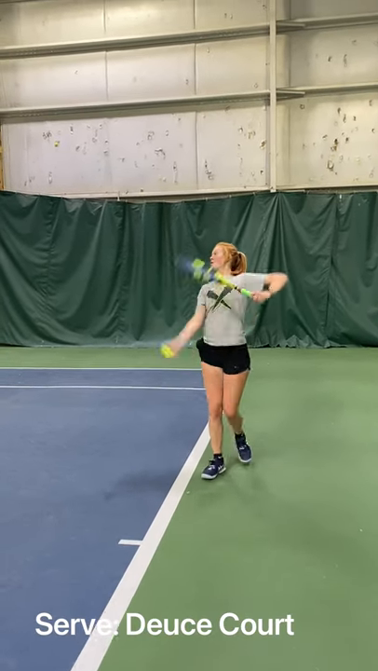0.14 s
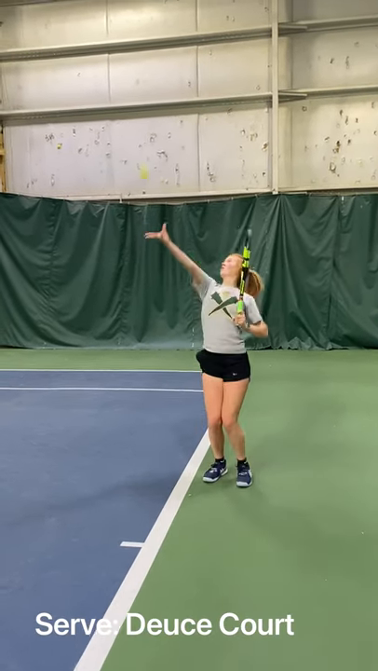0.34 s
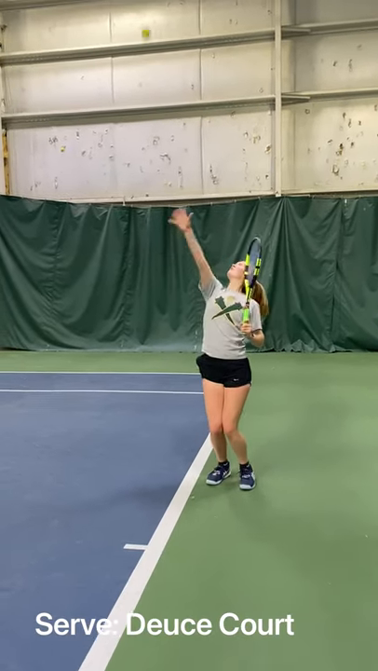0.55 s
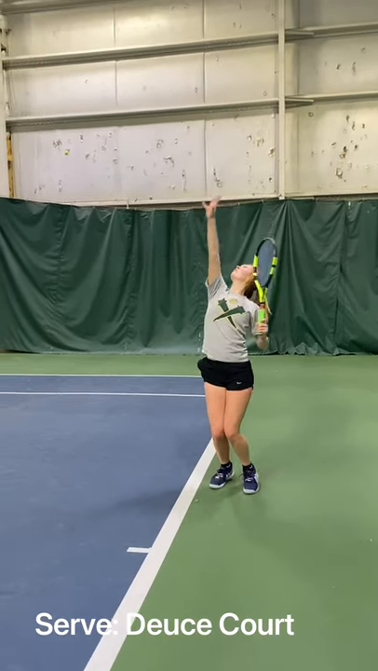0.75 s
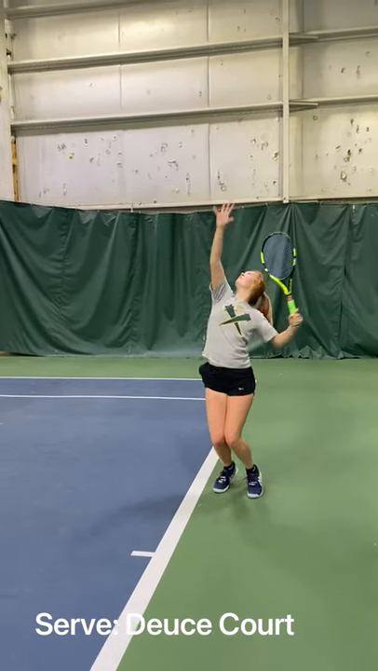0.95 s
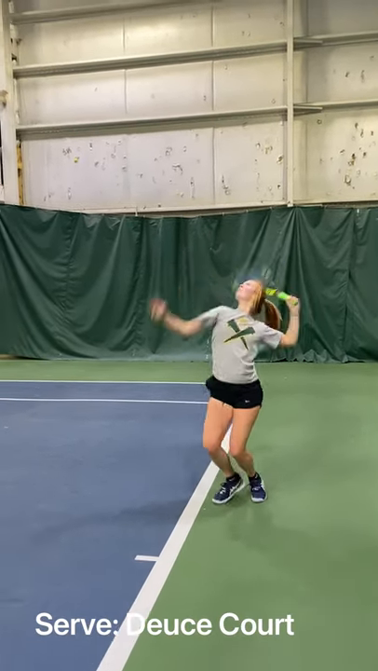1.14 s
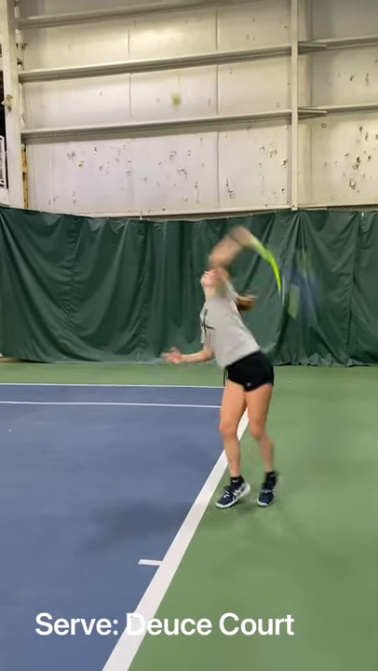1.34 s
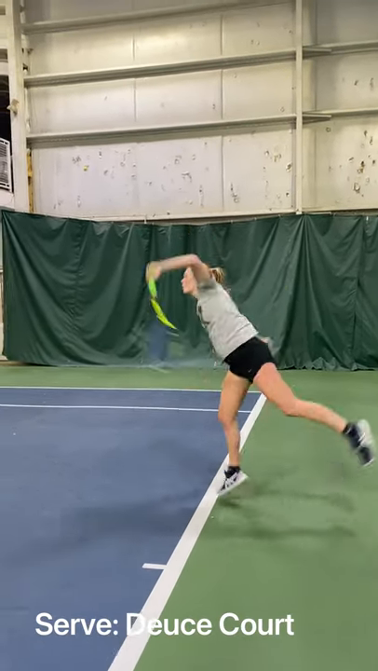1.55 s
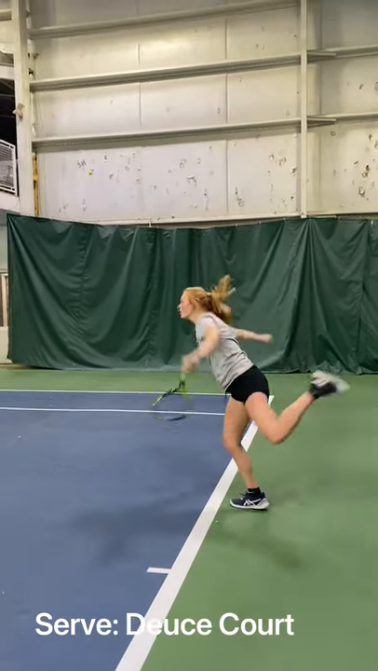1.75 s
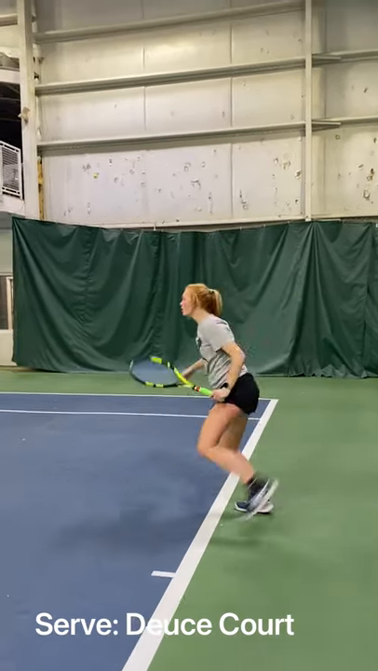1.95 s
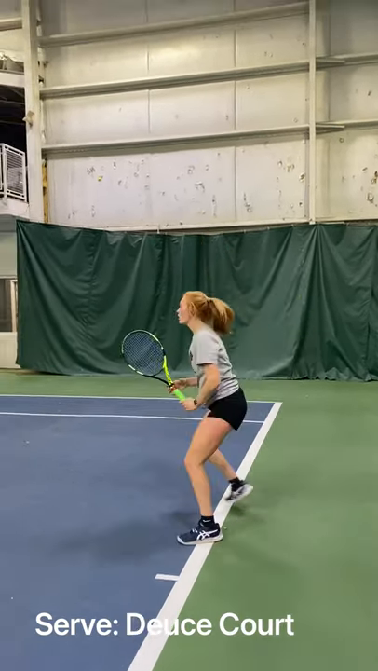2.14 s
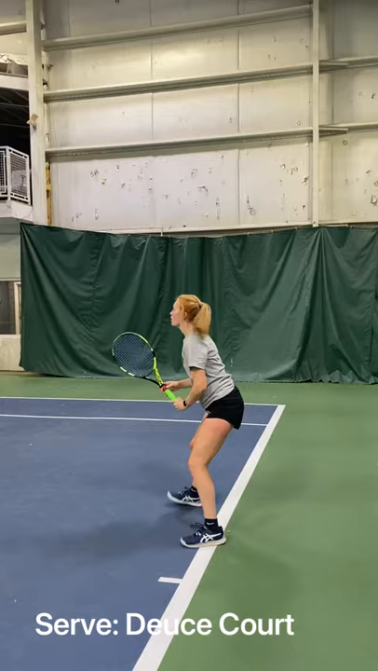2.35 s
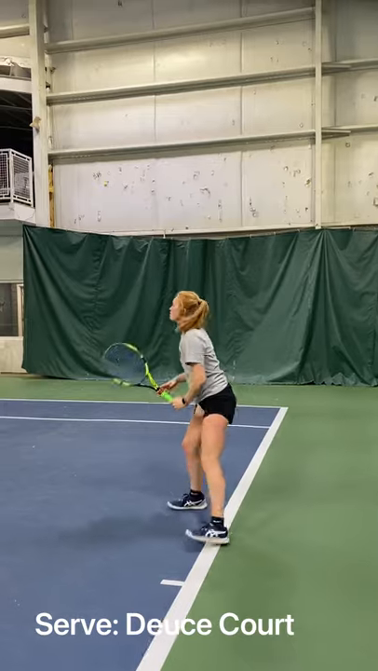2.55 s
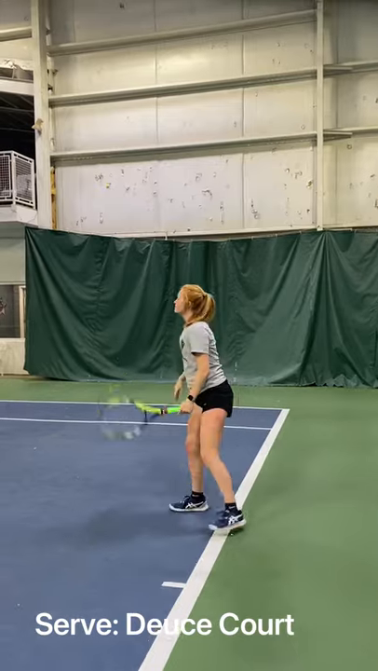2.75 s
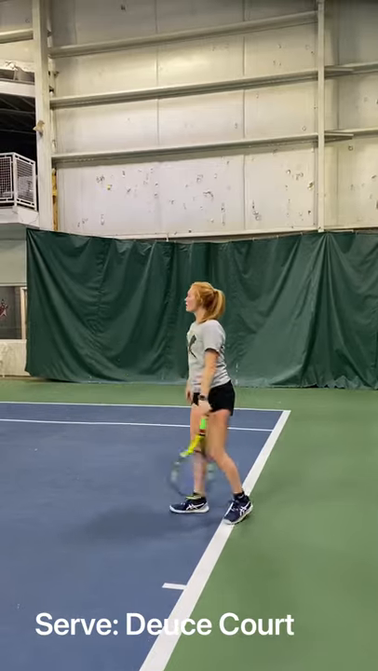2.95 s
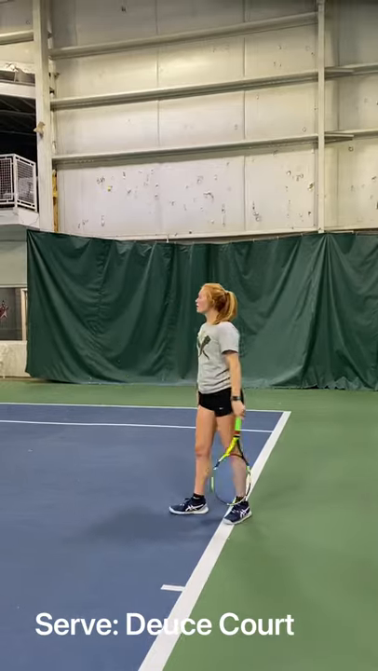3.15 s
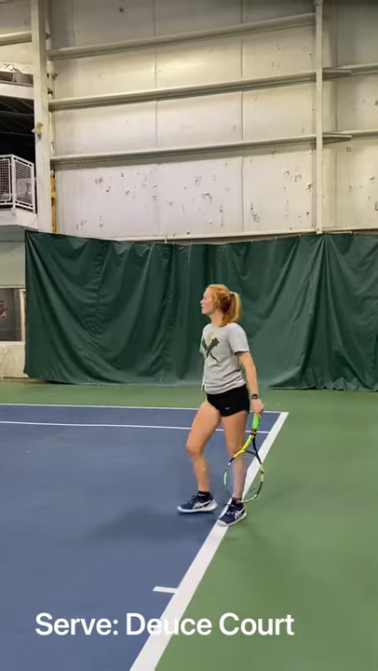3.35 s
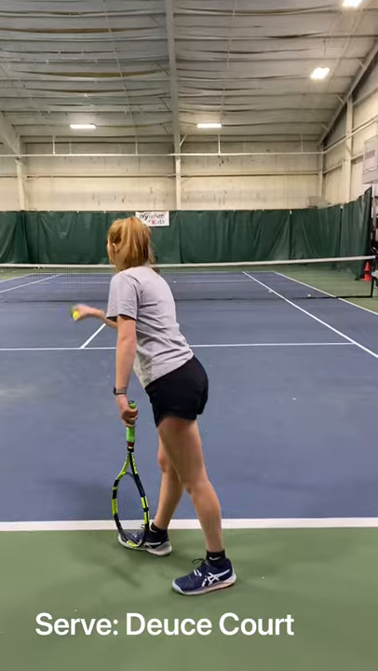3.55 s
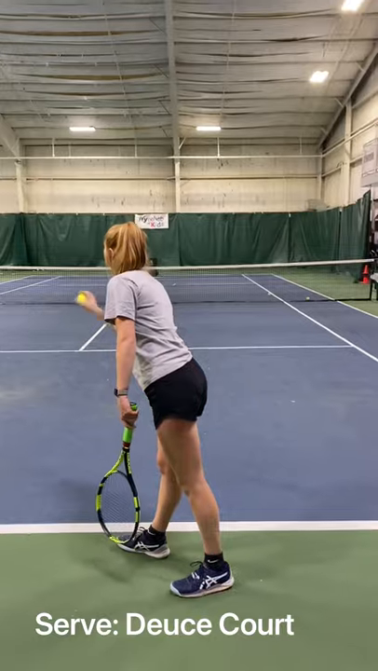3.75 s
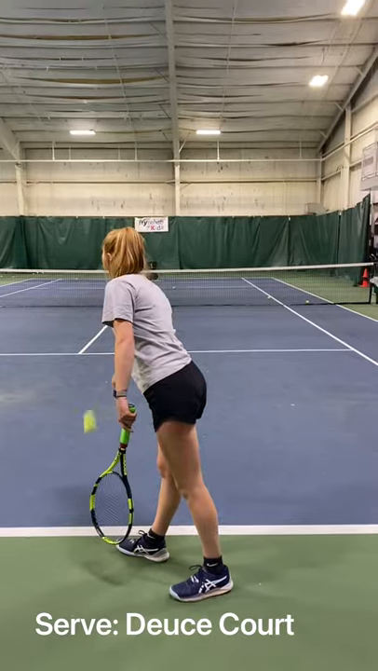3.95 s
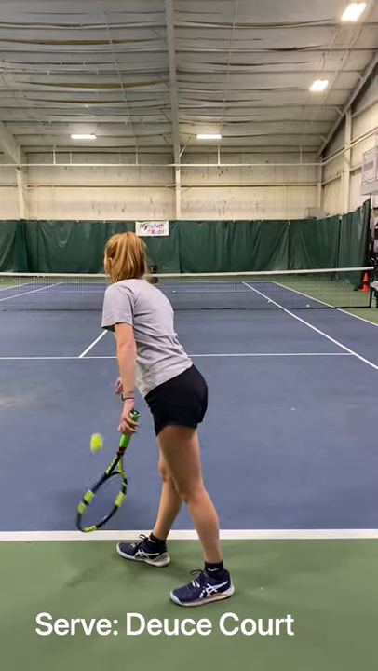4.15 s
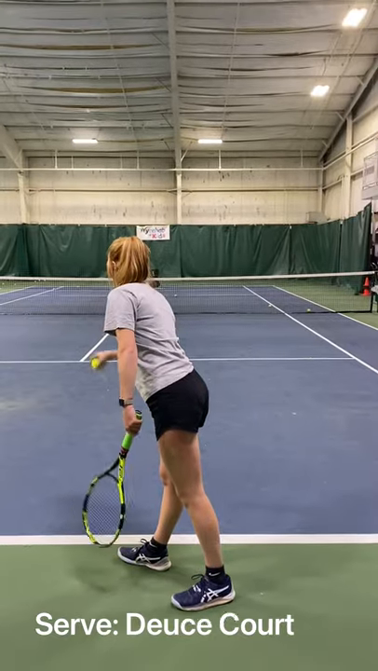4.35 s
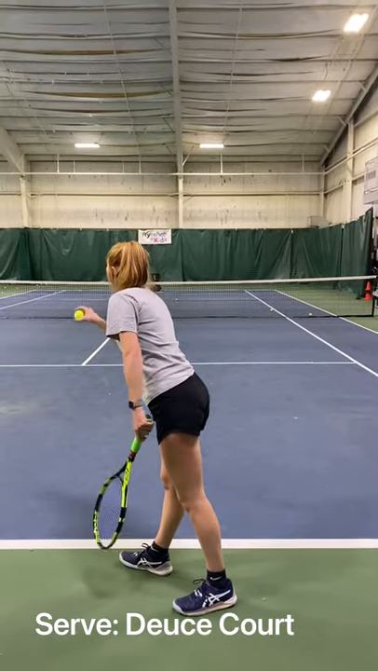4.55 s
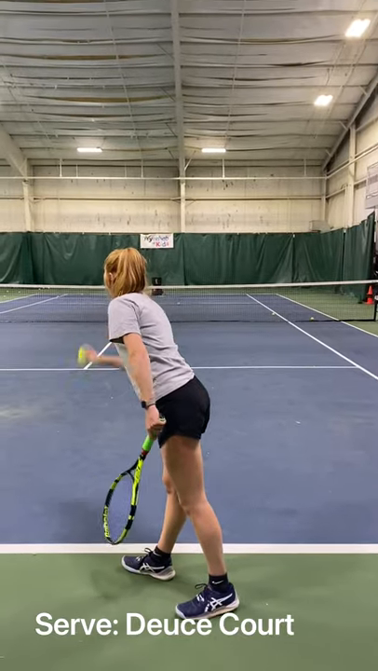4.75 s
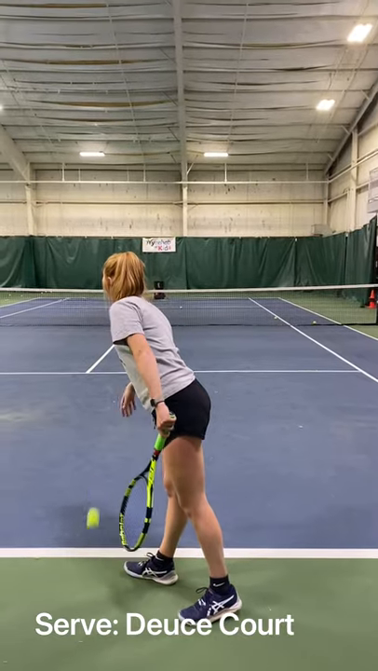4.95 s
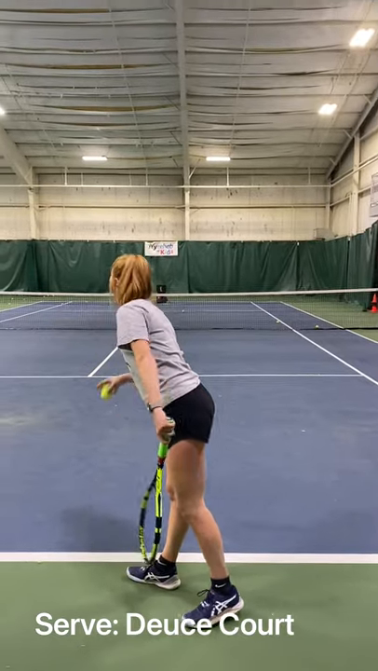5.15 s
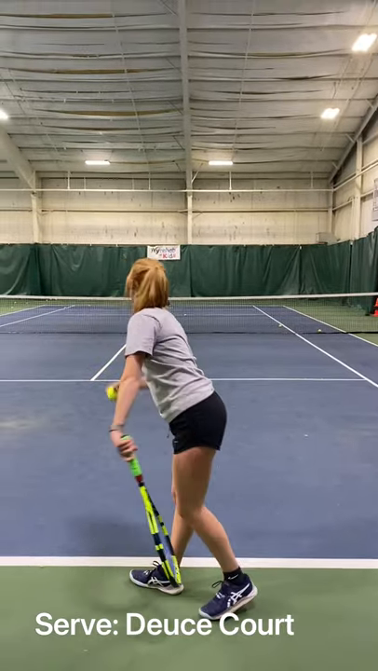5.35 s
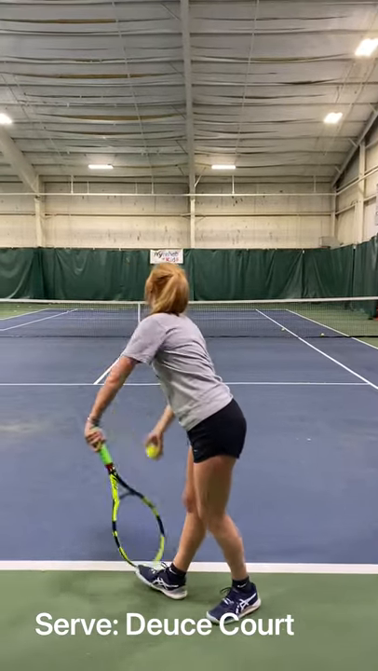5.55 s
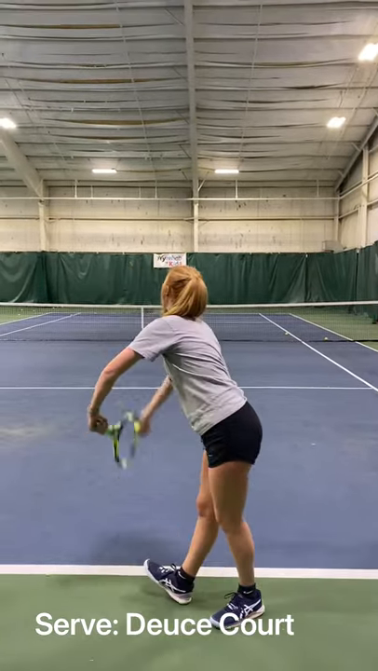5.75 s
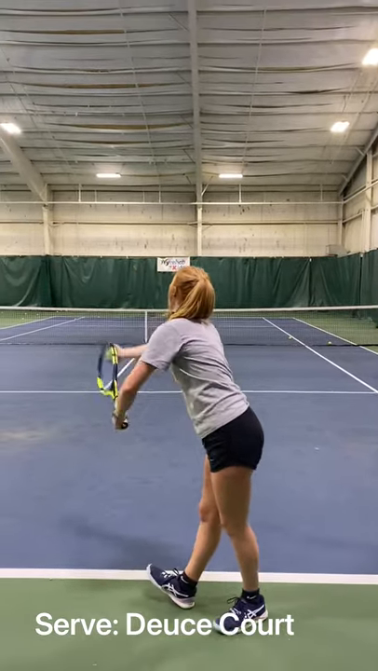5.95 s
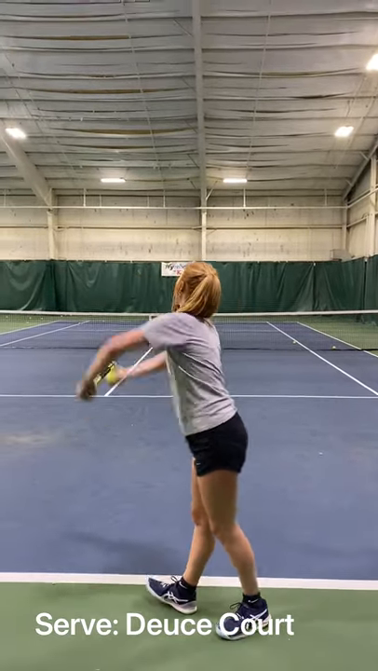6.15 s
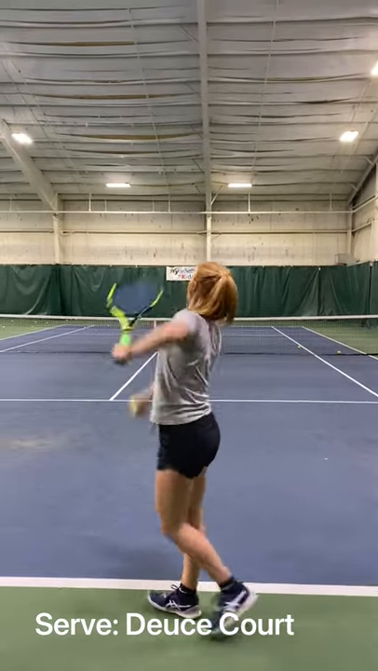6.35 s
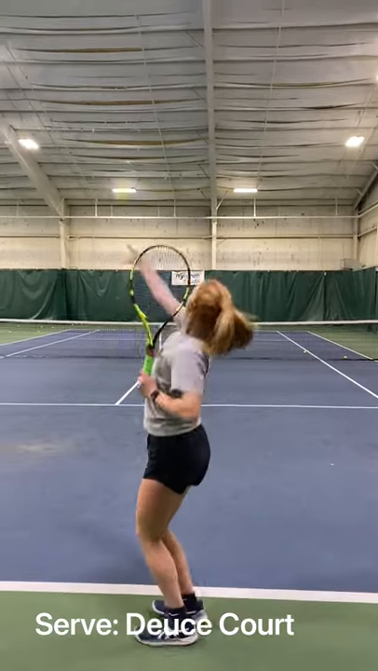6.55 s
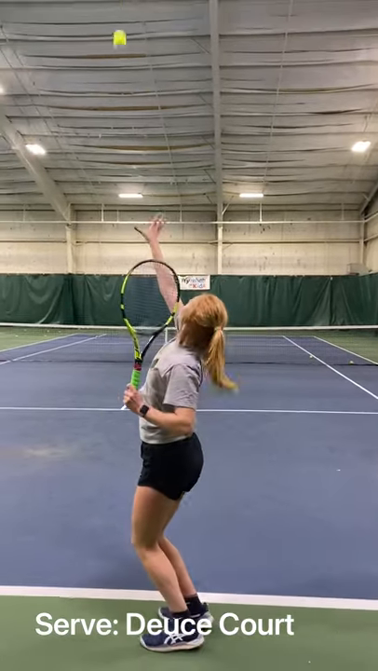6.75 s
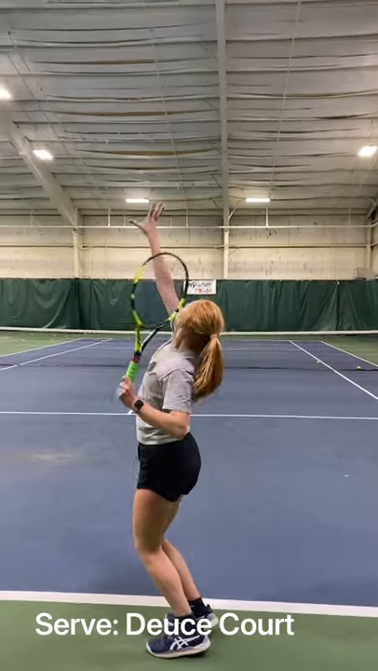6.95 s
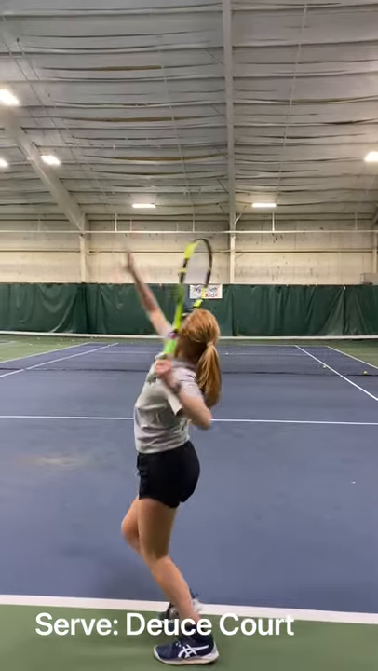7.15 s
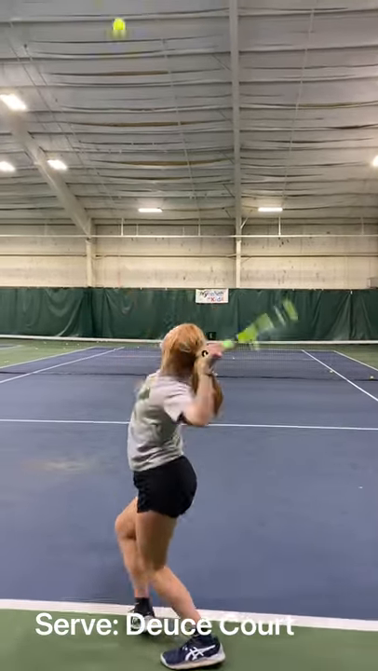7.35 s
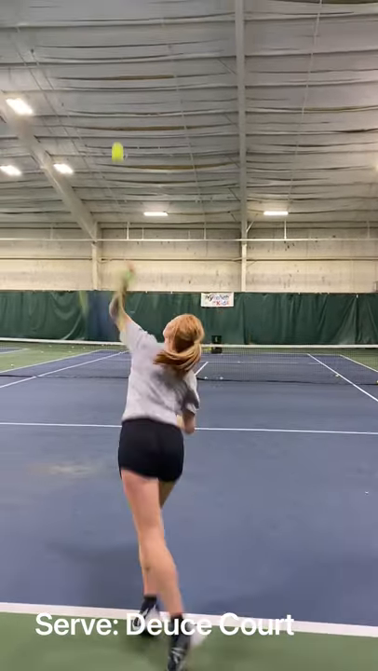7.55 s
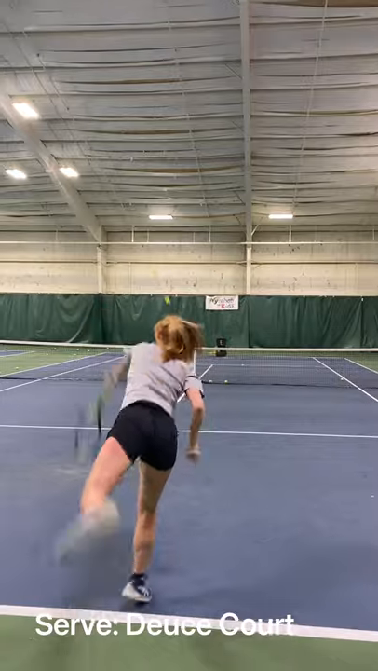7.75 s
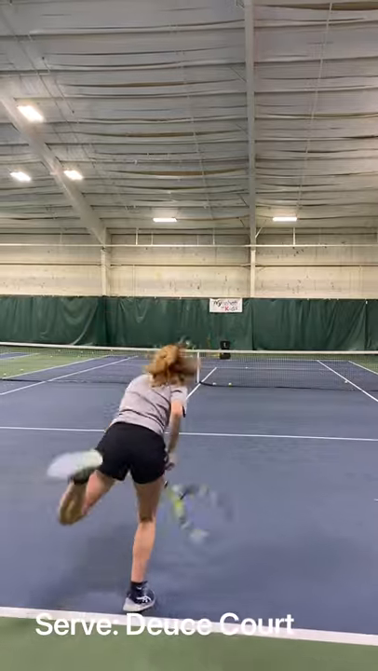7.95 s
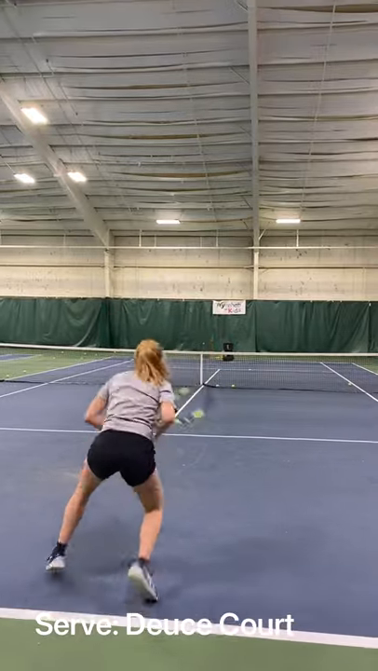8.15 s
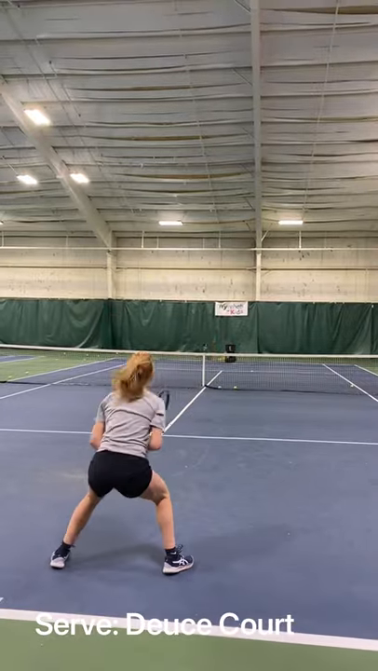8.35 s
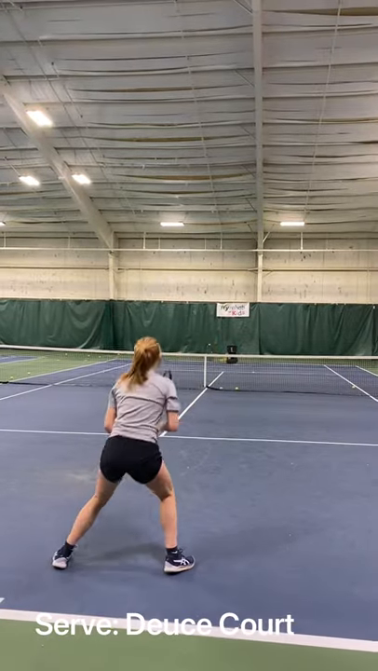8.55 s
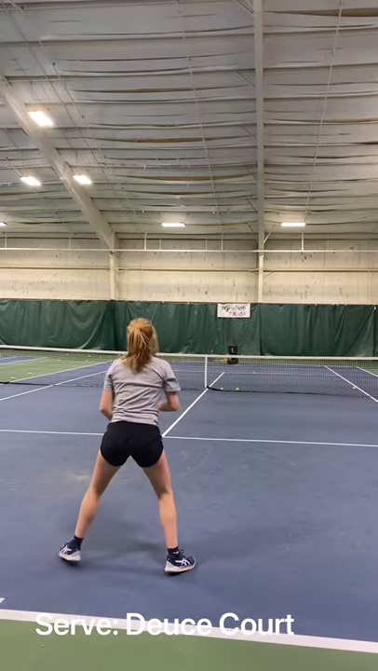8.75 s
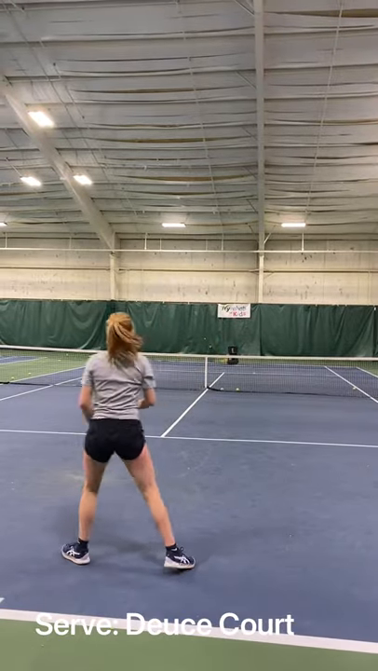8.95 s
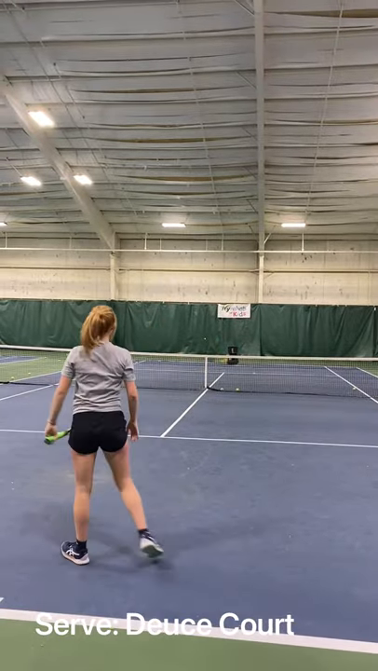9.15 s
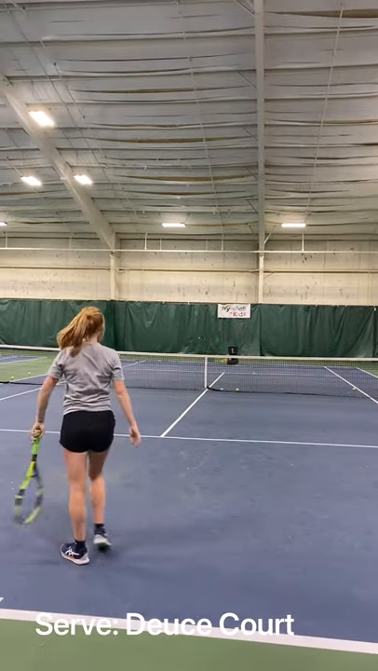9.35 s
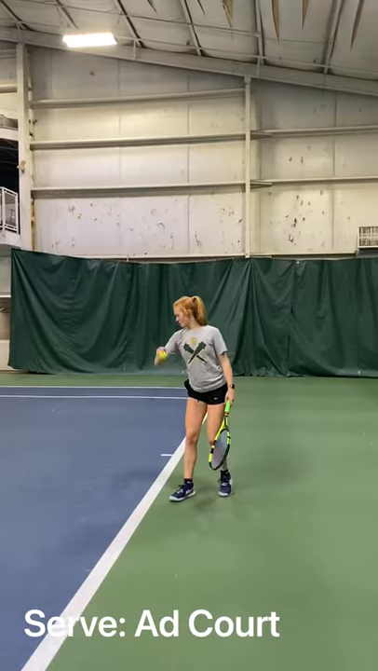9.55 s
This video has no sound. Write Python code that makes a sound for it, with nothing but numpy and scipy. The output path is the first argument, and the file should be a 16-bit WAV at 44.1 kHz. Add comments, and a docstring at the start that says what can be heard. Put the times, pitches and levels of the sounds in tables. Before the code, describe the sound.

A steady low ventilation rumble with faint hiss fills a large, echoing indoor tennis hall, picked up by a phone. At 0.2 s a sole scuffs and chirps; faint grit follows at 1.0 s. A quick swish ends at 1.35 s in a loud, hollow racket pop with ringing strings and a metallic ping, its tail spreading through the hall. Feet land softly at 1.5 s and squeak at 1.95 s. Around 2.85 s a distant bounce merges with a deep curtain boom that flutters back. Sound drops out for an instant at 3.45 s. Clear, pocking bounces come at 3.98 and 4.86 s, faint sole taps at 5.0 and 5.4 s, and a short squeak at 6.4 s. The second serve cracks at 7.54 s; dull steps follow, then a sharp shoe tap and squeaks at 8.1-8.25 s. The curtain thuds at 8.84 s. Another tiny dropout at 9.4 s leaves ventilation until 9.8 s.

```python
"""Ventilation rumbles through a large indoor tennis hall; soles scuff, tap and squeak on the gritty court.
A racket swishes and rings, balls bounce, and the far curtain stops them with a boom.
Blows and clicks drive resonances, squeaks are gliding partials, air and hall tails are shaped noise.
Roof, walls and hall answer each source; the two microphone ports of a phone pick it all up.
Twice the whole sound falls nearly silent for an instant."""
import sys
import numpy as np
from scipy import signal
from scipy.fft import rfft, irfft, next_fast_len
from scipy.io import wavfile
from scipy.ndimage import uniform_filter1d

SR = 44100
rng = np.random.default_rng(int(sys.argv[2]) if len(sys.argv) > 2 else 0)


def int16_out(signal):
    """Quantize to a 16-bit WAV file."""
    q = np.round(np.clip(np.atleast_2d(signal).T, -1, 1) * 32767)
    wavfile.write(sys.argv[1], SR, q.astype(np.int16))


N = 427769

# Source levels are those in the hall, ahead of the microphone; pan is left minus right.
# Stretches of full level: [start t/s, end t/s]
STRETCHES = [(0, 3.452), (3.492, 9.388), (9.429, 9.8)]
# Ventilation spectrum: [f/Hz, relative level per Hz/dB]
AIR = [(20, -35), (32, -28.5), (45, -14), (62, -1.5), (123, -6), (170, -16.5), (230, -18.5), (500, -32),
       (850, -31), (1700, -34.5), (2400, -34), (5600, -48.5), (7500, -60.5), (11000, -60.5), (16000, -68.5)]
AIR_RMS_DB = -48.5

# Rubber dragged over grit: [t/s, length/s, level before swell and fade/dB, centre f/Hz, width/Hz,
# pan/dB, share of the length spent swelling]
SCUFFS = [(0.194, 0.048, -38.5, 4500, 7500, -4, 0.059), (1.017, 0.094, -44.5, 4780, 5000, 0, 0.13),
          (1.242, 0.085, -56, 7070, 7500, -3, 0.18), (1.51, 0.022, -42, 6930, 7500, -6, 0.27),
          (1.939, 0.043, -39.5, 6000, 7500, -1.5, .05), (2.503, 0.048, -56.5, 8880, 5000, -17, .2),
          (5.302, .023, -63.5, 10000, 7500, -6, .1), (6.4, 0.029, -37, 4500, 7500, -2, .05),
          (7.221, 0.028, -43.5, 4730, 4000, -13, .3), (8.11, 0.02, -28.5, 5500, 7500, -5, .05),
          (8.173, 0.11, -38.5, 6000, 7500, -4, .6)]
SCUFF_ECHO, SCUFF_HALL_DB = (.036, -16), -17.5  # echo: delay/s, level/dB
# Soles and heels set down, small clicks: [t/s, peak level/dB, centre f/Hz, pan/dB, hall send/dB]
TAPS = [(0.1947, -30, 1400, 7, -16.5), (1.9400, -27.5, 797, 8, -8.5), (1.959, -24.5, 1600, -2, -9.5),
        (4.9783, -40, 7800, -18, -17), (5.365, -39.5, 8030, -3, -35), (6.3996, -31, 960, -1, -21.5),
        (8.024, -38.5, 5000, 0, -11.5), (8.1055, -13, 2780, 3, -12.5), (8.78, -40.5, 790, 7, -9)]
# Sole sticking and slipping: [t/s, length/s, start f/Hz, end f/Hz, level/dB,
# second partial over first/dB, pan/dB, echo/dB, hall send/dB]
SQUEAKS = [(0.203, 0.025, 3345, 2926, -28.5, -28, 5, -6.5, -23),
           (0.216, 0.011, 2810, 2500, -25, -4, 4.5, -12.5, -15.5),
           (1.952, .014, 3637, 3320, -41.5, -24.5, 3, -11, -4),
           (1.961, .016, 3184, 2921, -23, -5.5, -3, -4.5, -8.5),
           (6.409, .010, 3430, 3340, -46.5, -15, -27, -3, -14),
           (6.422, 0.0098, 2630, 2745, -18, -14, -3, -11, -18.5),
           (8.114, 0.011, 3453, 2940, -20, -6, -8, -13.5, -7),
           (8.127, .012, 3192, 2980, -22, -6, 1.5, -15, -17),
           (8.126, .026, 2904, 2239, -21, -2, 5, -8, -15),
           (8.243, 0.013, 2988, 2910, -26.5, -7.5, 0.5, -12.5, -7)]
GRIP, LET_GO = 0.17, 0.7  # shares of the length where the tone is full and starts to fade
RISE_DB, FALL_DB = -13.5, -15  # level at its two ends
BEAM_DB = -3  # upper partials beam at the listener and reach the hall weaker
SQUEAK_ECHO_S = .036
# Body weight coming down on the court, dull: [t/s, peak level/dB, length/s]
STEPS = [(0.204, -37, .014), (1.507, -34.5, 0.02), (1.529, -34.5, 0.085), (1.939, -32.5, 0.028),
         (2.042, -40, 0.021), (2.076, -35, 0.073), (2.289, -41, 0.085), (6.416, -38, 0.03),
         (7.846, -39, 0.044), (7.917, -39, 0.073), (8.131, -33, 0.031)]
STEP_HZ, STEP_HALL_DB = 262, -12.5
ROOF_ECHO = .032, -18  # delay/s, level/dB

# Hall tail by octave: [centre f/Hz, T60/s, relative level/dB]
HALL = [(87, 3, 0), (189.3, 2.1, -2.5), (360, 1.57, 3.5), (795, 1.5, 1.5), (1400, 1.66, 6),
        (2874, 1.78, 11), (5080, 0.99, 7.5), (11100, 0.58, 7.5)]
EARLY_T60_S, EARLY_DB, SWELL_S = 0.14, 9.5, 0.021  # reflections of near walls and roof fade first
# Far walls shape the tail: [t/s, spread/s, level change/dB]
WALL_ECHOES = [(.06, 0.0062, 3.5), (0.128, 0.0065, -2), (.175, 0.013, 0), (0.331, 0.024, 0)]
LUMP_DB, LUMP_S = 1.87, .025  # clusters of reflections make each octave of the tail uneven
ECHO_HZ = 5000  # the ribbed roof scatters treble away from the first echo
RIBS, RIBS_S = 0.15, 0.0063  # strength and spread of the scatter behind the first echo

# Racket on ball: [t/s, ring peak/dB, string crack peak/dB, frame ping peak/dB, string hum peak/dB,
# swish gain at its end/dB, swish swell/s, change of lowest racket mode/dB, roof echo delay/s,
# near wall echo delay/s, near wall echo/dB]
SERVES = [(1.3488, -5.5, -18.5, -15, -38, -33.5, 0.036, -1.5, .046, .021, -11.5),
          (7.5424, -6, -12, -21, -21, -33.5, 0.046, -3.5, .034, .016, -17)]
# Racket modes: [f/Hz, width/Hz, relative level/dB]
RACKET = [(206, 81, 2.5), (462, 270, 0.5), (850, 450, -2.5), (1400, 550, -8), (2237, 1400, -15),
          (3750, 790, -19), (5500, 1700, -22.5)]
# String crack modes: [f/Hz, width/Hz, relative level/dB]
STRINGS = [(5920, 2800, -3), (11100, 15000, -1.5)]
# Long ring of the strings: [f/Hz, width/Hz, relative level/dB]
STRING_BED = [(463, 14, 8), (1514, 150, -5), (2390, 120, -15.5)]
# Frame ping mode: [f/Hz, width/Hz, relative level/dB]
FRAME = [(2410, 36, 0)]
SWISH_S = .15  # from start of swish to hit
SERVE_PAN_DB, SERVE_ECHO_DB, SERVE_HALL_DB = 5, -11, -14

# Ball on the court: [t/s, pock peak before the felt/dB, thump peak/dB, hall send/dB]
BOUNCES = [(2.836, -28.5, -43.5, -2), (3.9756, -18, -23.5, -18.5), (4.8595, -16.5, -20.5, -19.5)]
# Modes of the ball's pock: [f/Hz, width/Hz, relative level/dB]
POCK = [(1204, 280, 1.5), (2030, 600, -5.5), (2420, 390, -8.5), (3620, 400, -18), (4660, 950, -21)]
# Mode of the floor's thump: [f/Hz, width/Hz, relative level/dB]
THUMP = [(269, 140, 0)]
FELT_HZ = 5400  # the felt swallows the treble of a bounce
THUMP_LATE_S = 0.0022  # the ball flattens before the floor answers
BOUNCE_ECHO = .030, -10  # delay/s, level/dB

# Ball into the heavy curtain: [t/s, boom peak/dB, slap peak/dB, boom and sway length/s,
# sway peak before its second resonance/dB, hall send/dB, slap length/s, slap dull above f/Hz, echo/dB]
THUDS = [(2.852, -12.5, -21, 0.018, -20, -6.5, .015, 3600, -2.5),
         (8.843, -15, -20, 0.045, -18, -8.5, 0.071, 5500, -8.5)]
# Boom modes of the sheet: [f/Hz, width/Hz, relative level/dB]
CURTAIN = [(203, 36, 1.5), (428, 66, -20.5), (553, 180, -13)]
# Slap modes of the cloth: [f/Hz, width/Hz, relative level/dB]
SLAP = [(546, 240, 4), (1040, 870, 7), (2500, 1600, 2.5), (5000, 9100, -4.5)]
# Swing of the whole sheet: [f/Hz, width/Hz, relative level/dB]
SWAY = [(89, 50, 0)]
FLUTTER_S, FLUTTER_DB, FLUTTER_LOSS_DB = .203, -12, -7  # the boom runs between the end walls
THUD_ECHO_S = .030

# Phone ports: [f/Hz, share of the left signal in the right one, left minus right/dB, right lag/rad]
PORTS = [(112, 1, -0.5, .03), (207.3, 0.98, 0.5, 0.083), (330, 1, -0.5, 0.75), (724, 0.62, 5, 0.25),
         (1060, 0.13, 4.5, 0.64), (1750, 0.18, 0.5, .1), (2530, 0.51, 0, 2.21), (4500, 0.75, 0, 0.92),
         (6000, 0.89, 2.5, 1.53), (6610, 1, -4.5, 2.33), (10320, 0.98, 1.5, 6.4), (13500, 1, -1.5, 9.4),
         (16000, 0.93, 3.5, 12)]
LATE_TURNS, LATE_HZ = 0.96, 200.8  # filter delay in cycles, well above LATE_HZ
GAP_DB, TOP_HZ = -35, 16000


def undb(db):
    """Amplitude ratio of a level in dB."""
    return 10 ** (np.asarray(db) / 20)


def ventilation():
    """Air handling: steady noise with the spectrum of rumble and hiss, unrelated left and right."""
    f = np.fft.rfftfreq(N, 1 / SR)
    hz, db = np.transpose(AIR)
    spectrum = undb(np.interp(np.log(f + 1), np.log(hz), db))
    air = irfft(rfft(rng.standard_normal((2, N))) * spectrum, N)
    return air * undb(AIR_RMS_DB) / air.std()


def band(x, hz, width_hz):
    """Two-pole resonance, gain 1 at the centre."""
    return signal.lfilter(*signal.iirpeak(hz, hz / width_hz, fs=SR), x)


def lowpass(x, order, hz):
    """Butterworth loss of treble above hz."""
    return signal.sosfilt(signal.butter(order, hz, fs=SR, output="sos"), x)


def scuff(length_s, db, hz, width_hz, rise):
    """Dense grit clicks, uneven in size and in patches, swelling and then dragging out."""
    share = np.arange(int(length_s * SR)) / (length_s * SR)
    patchy_db = 1.5 * np.repeat(rng.standard_normal(len(share) // 130 + 1), 130)[:len(share)]
    size_db = patchy_db + 2.7 * rng.exponential(size=len(share))
    clicks = rng.standard_normal(len(share)) * undb(size_db)
    grit = band(band(clicks, hz, width_hz), hz, min(2.0 * width_hz, .4 * SR))
    drag = np.interp(share, [0, np.clip(rise, .01, .7), .75, 1], [.3, 0.99, 0.75, 0.13])
    return undb(db) * grit / grit.std() * drag


def clean_blow():
    """One instantaneous push."""
    push = np.zeros(int(.15 * SR))
    push[0] = 1
    return push


def contact(length_s, grain):
    """One blow with a rattle of weaker contacts that dies over length_s."""
    blow = clean_blow()
    t = np.arange(len(blow)) / SR
    rattle = grain * rng.standard_normal(len(t)) ** 3 * np.exp(-3 * (t / length_s) ** 2)
    return blow + rattle


def ring(push, modes, db, soft_hz):
    """The modes of a body driven by push, scaled to a peak; a soft contact gives little above soft_hz."""
    push = lowpass(push, 2, min(soft_hz, .45 * SR))
    y = 0
    for k, (hz, width, mode_db) in enumerate(modes):
        gain = (-1) ** k * undb(mode_db) * np.sqrt(hz / width)
        y = y + gain * band(push, hz, width)
    return y * undb(db) / np.abs(y).max()


def tap(db, hz):
    """A sole or heel set down: a brief rattling blow rings one broad mode and a weaker low one."""
    return ring(contact(0.0044, 0.17), [(hz, 1.2 * hz, 0), (450, 300, -6)], db, 2 * hz)


def squeak(length_s, from_hz, to_hz, db, second_db):
    """Stick-slip tone that grips, holds and lets go: gliding, wavering rate, four partials."""
    share = np.arange(int(length_s * SR)) / (length_s * SR)
    waver = 1 + 0.2 * uniform_filter1d(rng.standard_normal(len(share)), 40)
    rate_hz = (from_hz + (to_hz - from_hz) * share) * waver
    phase = 2 * np.pi * np.cumsum(rate_hz) / SR
    upper = np.sin(2 * phase) + undb(-12.0) * np.sin(3 * phase) + undb(-26.0) * np.sin(4 * phase)
    upper = undb(second_db + np.array([[0], [BEAM_DB]])) * upper  # rows: heard, sent to the hall
    grip_db = np.interp(share, [0, GRIP, max(GRIP, LET_GO), 1], [RISE_DB, 0, 0, FALL_DB])
    return np.sqrt(2) * undb(db + grip_db) * (np.sin(phase) + upper)


def step(db, length_s):
    """Body weight on the court: a rattling blow into one broad, low mode."""
    return ring(contact(length_s, 0.23), [(STEP_HZ, 1.6 * STEP_HZ, 0)], db, STEP_HZ)


def place(bus, sound, s, pan_db, echo_s, echo_db, hall_db):
    """Direct sound left and right, one smeared echo off roof or wall, and the share sent to the hall."""
    heard, sent = sound if sound.ndim == 2 else (sound, sound)
    i, j = int(s * SR), int((s + echo_s) * SR)
    bus[:2, i:i + len(heard)] += heard * undb([[pan_db / 2], [-pan_db / 2]])
    t = np.arange(SR // 30) / SR
    ribs = RIBS * rng.standard_normal((2, len(t))) * np.exp(-t / RIBS_S)
    ribs[:, 0] += 1
    ribs /= np.sqrt(np.sum(ribs ** 2, axis=1, keepdims=True))
    echo = lowpass(signal.fftconvolve(heard[None], ribs, axes=1), 1, ECHO_HZ)
    bus[:2, j:j + echo.shape[1]] += undb(echo_db) * echo
    bus[2, i:i + len(sent)] += undb(hall_db) * sent


def hall():
    """The steel hall: two unrelated noise tails, each octave fading at its own rate."""
    t = np.arange(int(1.8 * SR)) / SR
    tail = 0
    for hz, t60, db in HALL:
        edges = [hz / np.sqrt(2), hz * np.sqrt(2)]
        sos = signal.butter(2, edges, "band", fs=SR, output="sos")
        fade = undb(-60 * t / t60) + undb(EARLY_DB - 60 * t / EARLY_T60_S)
        lumps = np.interp(t, np.arange(200) * LUMP_S, rng.standard_normal(200))
        octave = signal.sosfilt(sos, rng.standard_normal((2, len(t))))
        tail = tail + undb(db + LUMP_DB * lumps) * fade * octave
    walls_db = sum(db * np.exp(-((t - s) / spread) ** 2) for s, spread, db in WALL_ECHOES)
    swell = 1 - np.exp(-(t / SWELL_S) ** 2)
    return tail * undb(walls_db) * swell / np.sqrt(SR / 10)


def strike(length_s, grain, modes, db, soft_hz):
    """A rattling blow as heard; the hall, averaging all directions, gets a clean one of equal energy."""
    heard = ring(contact(length_s, grain), modes, db, soft_hz)
    sent = ring(clean_blow(), modes, db, soft_hz)
    return np.array([heard, sent * heard.std() / sent.std()])


def serve(ring_db, crack_db, ping_db, bed_db, swish_db, swell_s, low_db, wall_s, wall_db):
    """The racket swishes up, then ball and frame ring while the strings crack and hum on."""
    t = np.arange(int(SWISH_S * SR)) / SR - SWISH_S
    air = band(band(rng.standard_normal(len(t)), 900, 2500), 900, 3300)
    swish = undb(swish_db) * air * np.exp(t / swell_s)
    (hz, width, db), *upper = RACKET  # an off-centre hit bends the frame less
    hit = strike(0.018, 0.034, [(hz, width, db + low_db), *upper], ring_db, 5500)
    hit += strike(0.0096, 0.33, STRINGS, crack_db, 18000)
    hit += ring(clean_blow(), STRING_BED, bed_db, 5000) * undb([[0], [6.0]])  # spreads more to the hall
    hit[0] += ring(contact(0.002, .05), FRAME, ping_db, 5000)  # the ping beams at the listener
    sound = np.hstack([[swish, swish], hit])
    near_wall = np.roll(band(sound[0], 600, 1500), int(wall_s * SR))
    sound[0] = sound[0] + undb(wall_db) * near_wall
    return sound


def bounce(db, thump_db):
    """A push and its rebound ring the ball's pock, dulled by felt; the floor thumps just after."""
    pock = ring(np.diff(clean_blow(), prepend=0), POCK, db, 2130)
    thump = ring(clean_blow(), THUMP, thump_db, 220)
    return lowpass(pock, 4, FELT_HZ) + np.roll(thump, int(THUMP_LATE_S * SR))


def thud(boom_db, slap_db, length_s, sway_db, slap_s, slap_hz):
    """The cloth slaps, the sheet booms and sways; the boom returns twice from the far end, weaker."""
    sound = strike(length_s, 0.14, CURTAIN, boom_db, 760) + strike(slap_s, .2, SLAP, slap_db, slap_hz)
    sound = sound + band(strike(length_s, 0.084, SWAY, sway_db, 200), *SWAY[0][:2])
    back = np.zeros(SR)
    for k in range(2):
        i = int((k + 1) * FLUTTER_S * SR)
        back_db = boom_db + FLUTTER_DB + k * FLUTTER_LOSS_DB
        back[i:i + sound.shape[1]] += ring(contact(0.07, 0.083), CURTAIN[:1], back_db, 380)
    return sound, back


def scene():
    """Every source placed in the hall, with its tails and the ventilation."""
    bus = np.zeros((3, N + SR))  # left, right, hall send
    for s, length_s, db, hz, width_hz, pan_db, rise in SCUFFS:
        place(bus, scuff(length_s, db, hz, width_hz, rise), s, pan_db, *SCUFF_ECHO, SCUFF_HALL_DB)
    for s, db, hz, pan_db, hall_db in TAPS:
        place(bus, tap(db, hz), s, pan_db, *ROOF_ECHO, hall_db)
    for s, *tone, pan_db, echo_db, hall_db in SQUEAKS:
        place(bus, squeak(*tone), s, pan_db, SQUEAK_ECHO_S, echo_db, hall_db)
    for s, db, length_s in STEPS:
        place(bus, step(db, length_s), s, 0, *ROOF_ECHO, STEP_HALL_DB)
    for s, *blow, echo_s, wall_s, wall_db in SERVES:
        sound = serve(*blow, wall_s, wall_db)
        place(bus, sound, s - SWISH_S, SERVE_PAN_DB, echo_s, SERVE_ECHO_DB, SERVE_HALL_DB)
    for s, db, thump_db, hall_db in BOUNCES:
        place(bus, bounce(db, thump_db), s, 0, *BOUNCE_ECHO, hall_db)
    for s, *blow, hall_db, slap_s, slap_hz, echo_db in THUDS:
        sound, back = thud(*blow, slap_s, slap_hz)
        place(bus, sound, s, 0, THUD_ECHO_S, echo_db, hall_db)
        i = int(s * SR)
        bus[:2, i:i + SR] += back
    out, tails = bus[:2, :N] + ventilation(), hall()
    for start, end in STRETCHES:  # hall tails stop at the end of their stretch
        i, j = int(start * SR), min(int(end * SR), N)
        out[:, i:j] += signal.fftconvolve(bus[2:, i:j], tails, axes=1)[:, :j - i]
    return out


def record(dry):
    """Two phone ports: partly shared signal, tilt and lag by frequency, late low tones, cut top; twice the
    whole sound dips nearly silent."""
    size = next_fast_len(N + SR // 10)
    f = np.fft.rfftfreq(size, 1 / SR)
    left, right = rfft(dry, size)
    hz, share, tilt_db, lag = np.transpose(PORTS)
    share = np.interp(f, hz, share)
    tilt = undb(np.interp(f, hz, tilt_db) / 2)
    right = share * left + np.sqrt(1 - share ** 2) * right
    right = right * np.exp(-1j * np.interp(f, hz, lag))
    late = np.exp(-2j * np.pi * LATE_TURNS * np.log(np.hypot(f, LATE_HZ) / 8000))
    ports = irfft(np.array([left * tilt, right / tilt]) * late, size)[:, :N]
    t = np.arange(N) / SR
    live = sum((t >= start) & (t < end) for start, end in STRETCHES)
    ports = ports * np.maximum(uniform_filter1d(1. * live, 120), undb(GAP_DB))
    return signal.sosfilt(signal.ellip(10, .2, 70, TOP_HZ, fs=SR, output="sos"), ports)


dry = scene()
out = record(dry)
int16_out(out)
```